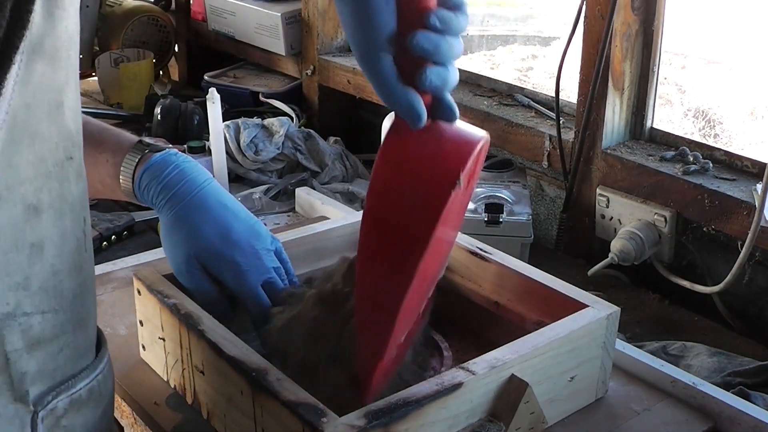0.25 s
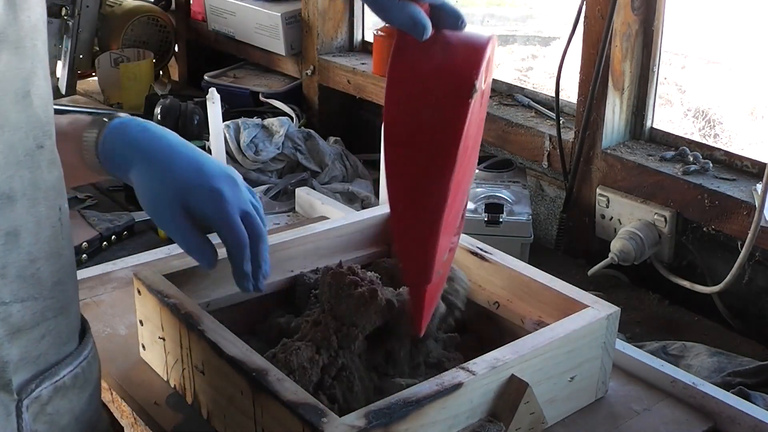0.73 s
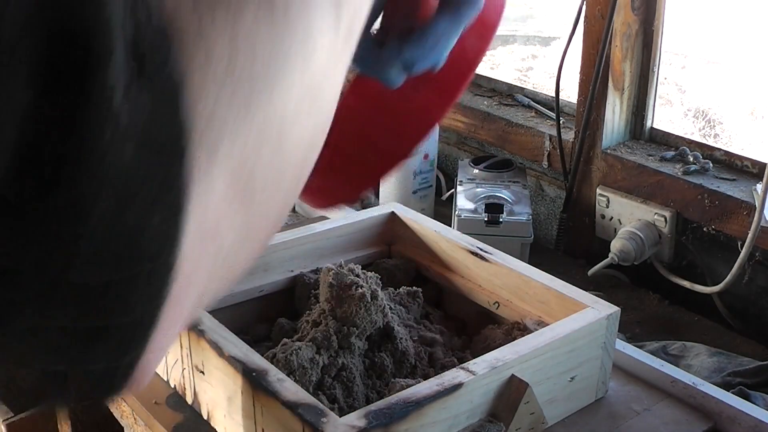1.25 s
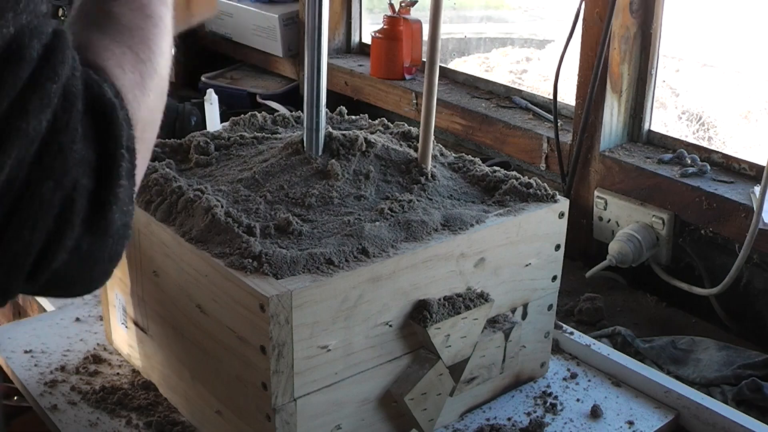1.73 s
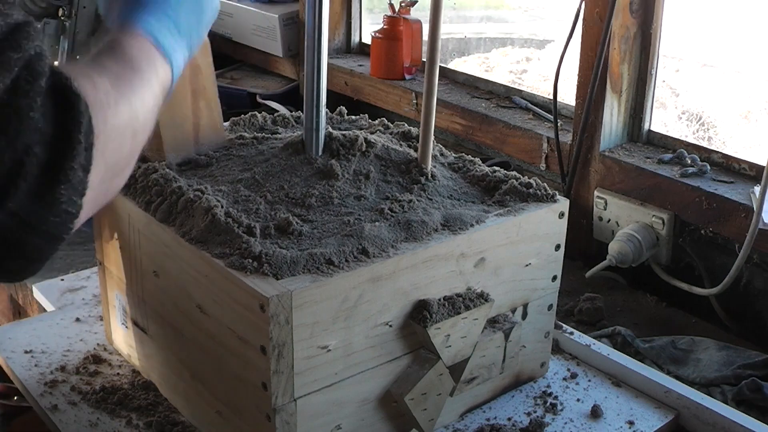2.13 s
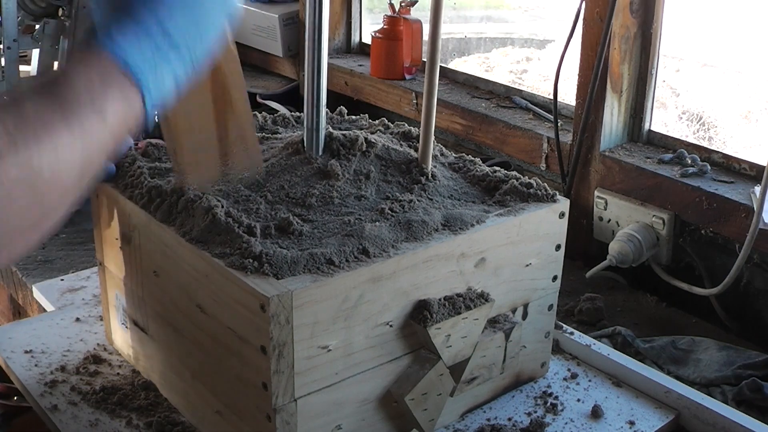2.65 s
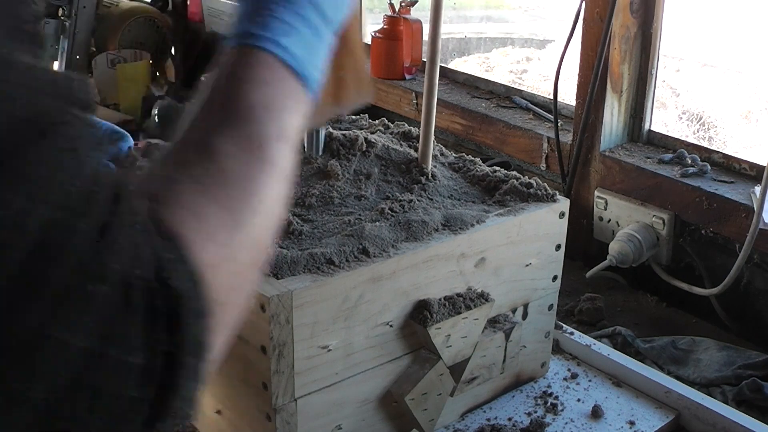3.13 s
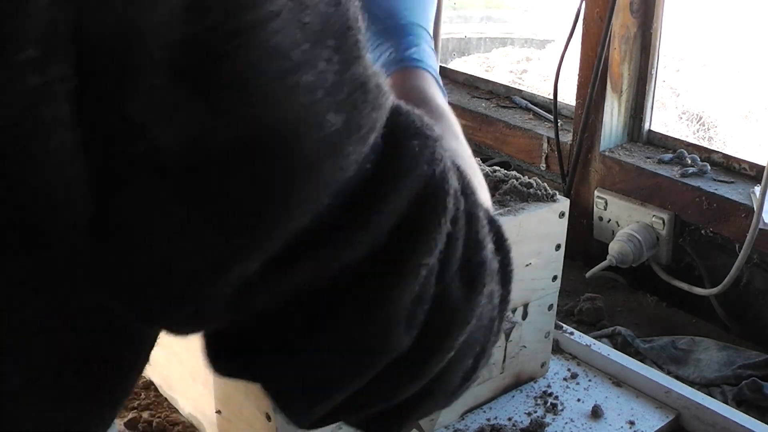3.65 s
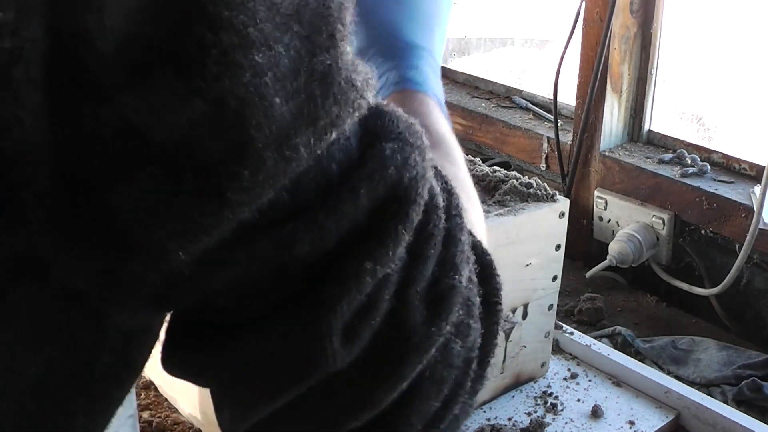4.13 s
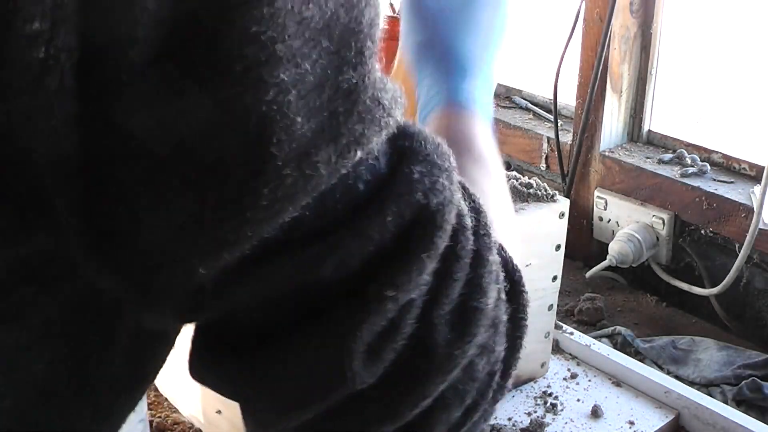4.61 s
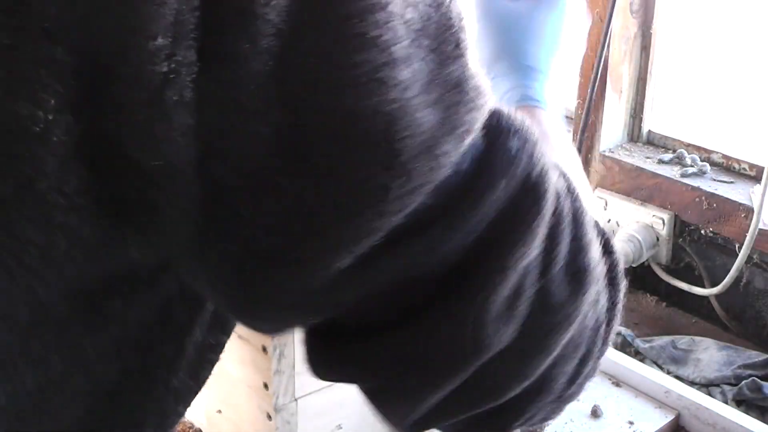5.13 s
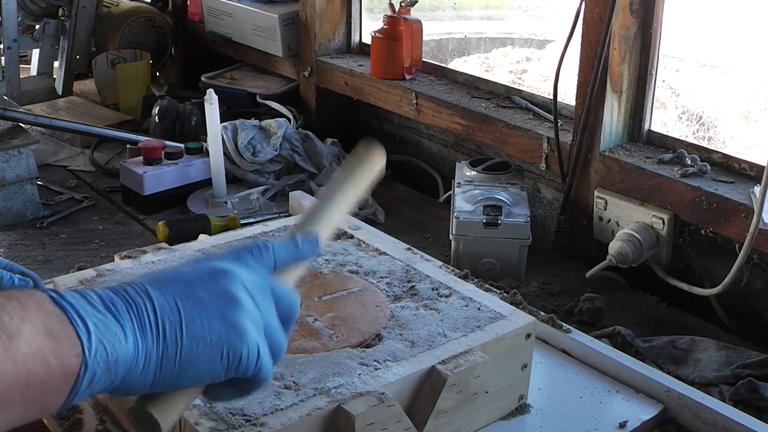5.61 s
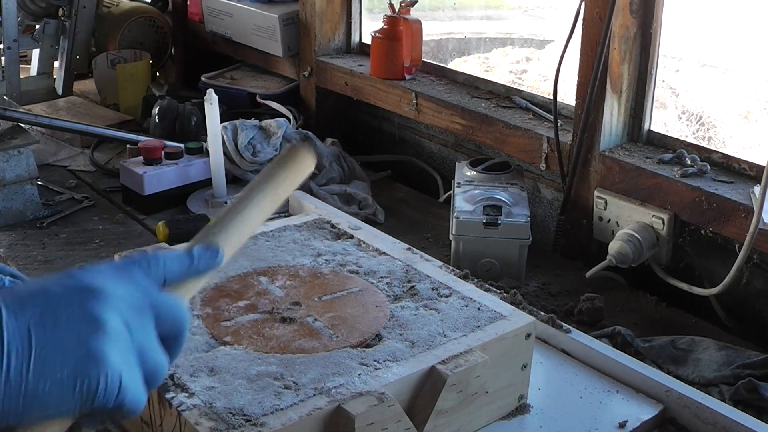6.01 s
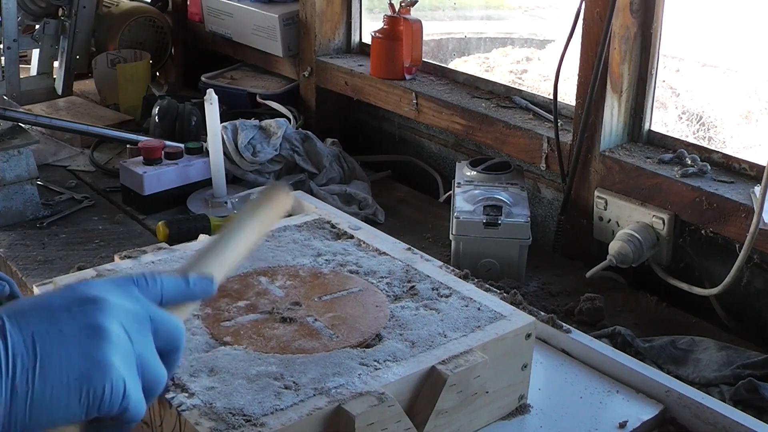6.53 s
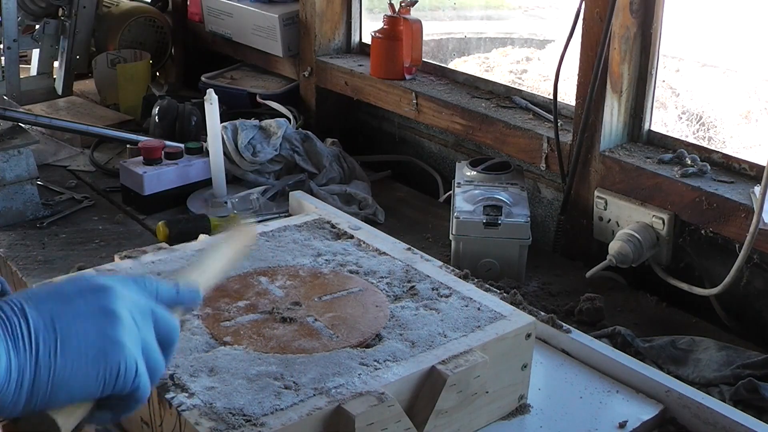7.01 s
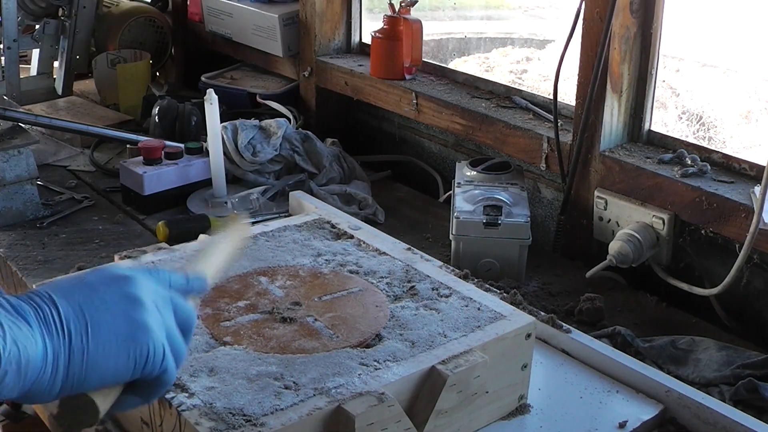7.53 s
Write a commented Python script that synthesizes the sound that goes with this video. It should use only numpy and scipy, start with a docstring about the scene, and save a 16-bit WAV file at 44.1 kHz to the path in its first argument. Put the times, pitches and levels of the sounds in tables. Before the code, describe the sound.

Sand hisses off a scoop and drops into a wooden box with a knock, followed by soft crumbles and rustles. A wooden rammer then packs it with about a dozen dull, gritty thuds that shake the bench. Finally a wooden rod raps the mould in quick, sharp taps that ring briefly. It is all heard from close by in a small workshop, over steady dull air noise.

```python
"""A small workshop, heard from close by. First, moulding sand hisses off a scoop and drops into a
wooden box on a bench, with short crumbles and soft rustles. From 1.3 s a wooden rammer packs the sand:
each blow crushes grains, thuds in the box and sets the bench shaking. From 5.4 s a wooden rod raps the
finished mould in quick, sharp taps, which make it ring. Dull air noise runs underneath throughout."""
import sys
import numpy as np
from scipy import signal
from scipy.fft import rfft, irfft, next_fast_len
from scipy.io import wavfile
from scipy.ndimage import uniform_filter1d, minimum_filter1d

SR = 44100
rng = np.random.default_rng(int(sys.argv[2]) if len(sys.argv) > 2 else 0)


def int16_out(signal):
    """Quantize to a 16-bit WAV file."""
    q = np.round(np.clip(np.atleast_2d(signal).T, -1, 1) * 32767)
    wavfile.write(sys.argv[1], SR, q.astype(np.int16))


N = 342255
TIME = np.arange(N) / SR   # seconds since the scene began
AGE = np.arange(2 ** 15) / SR   # seconds since one short sound began
RAPPING_START_S = 5.365


def amp(db):
    """Turn decibels into a gain to multiply by."""
    return 10 ** (np.asarray(db) / 20)


def rms_one(x):
    """Scale a sound so that its average strength (rms) is 1."""
    return x / np.sqrt(np.mean(x ** 2) + 1e-20)


def peak_one(x):
    """Scale a blow so that its loudest 4 milliseconds have an rms of 1."""
    return x / np.sqrt(uniform_filter1d(x ** 2, size=176, mode="constant").max() + 1e-20)


def at_hz(points, hz):
    """Read between the rows of a table, with frequency counted in octaves."""
    known, values = np.transpose(points)
    return np.interp(np.log(np.maximum(hz, 1)), np.log(known), values)


def add(track, s, sound):
    """Mix a sound into the track, starting at s seconds."""
    start = max(round(s * SR), 0)
    track[start:start + len(sound)] += sound[:N - start]


def coloured(x, spectrum, size=2048):
    """Give a sound a tone colour, using a filter that never rings ahead of a hit (minimum phase)."""
    hz = np.arange(size // 2 + 1) * SR / size
    cepstrum = irfft(np.log(amp(at_hz(spectrum, hz))))
    cepstrum[1:size // 2] *= 2
    cepstrum[size // 2 + 1:] = 0
    return signal.oaconvolve(x, irfft(np.exp(rfft(cepstrum))))[:len(x)]


def dying(t60):
    """A smooth fade. The fade time, t60, is the seconds it takes to fall by 60 dB."""
    return np.exp(-np.log(1000) * AGE / t60)


def fading(s, t60, attack_s=0.0052):
    """A gain over the whole scene: a quick rise at s seconds, then a fade."""
    age = np.maximum(TIME - s, 0)
    return np.minimum(age / attack_s, 1) * amp(-60 * age / t60)


def grains(spread_db, count=len(AGE)):
    """Dense tiny clicks; more spread makes their sizes more unequal."""
    return rng.standard_normal(count) * amp(spread_db * rng.standard_normal(count))


def contact(scatter, t60):
    """One click, followed by a dying scatter of others."""
    force = scatter * rng.standard_normal(len(AGE)) * dying(t60)
    force[0] += 1
    return force


def ring(modes, vary_db, centre_hz=1000, focus_db=0, detune=0):
    """A struck object's own notes (modes), new on each hit; focus_db weakens those far from centre_hz."""
    hz, db, t60 = np.transpose(modes)
    off_centre_db = focus_db * np.log2(hz / centre_hz) ** 2
    strength = amp(db + vary_db * rng.standard_normal(len(hz)) - off_centre_db)
    strength[1::2] *= -1
    hz = hz * (1 + detune * rng.standard_normal(len(hz)))   # the load of sand and hand shifts the notes
    return strength @ (np.sin(2 * np.pi * hz[:, None] * AGE) * dying(t60[:, None]))


# Sound from all around. Each row: frequency in Hz, how alike left and right are from 0 to 1.
EAR_LIKENESS = [(100, 0.89), (500, 0.98), (2000, 0.83), (4000, 0.69), (8000, 0.79), (12000, 1),
                (16000, 0.4)]

def diffuse(spectrum, spread_db=0, count=N):
    """Stereo noise from all around, mostly more alike in the bass than in the treble."""
    size = next_fast_len(count, True)
    hz = np.arange(size // 2 + 1) * SR / size
    alike = np.clip(at_hz(EAR_LIKENESS, hz), -.999, .999)
    colour = amp(at_hz(spectrum, hz))
    mid, side = (irfft(rfft(grains(spread_db, size)) * colour * np.sqrt(share), size)[:count]
                 for share in (1 + alike, 1 - alike))
    return rms_one(np.array([mid + side, mid - side]))


# Tone colours of the air, the hiss and the rumble. Each row: frequency in Hz, relative level in dB.
AIR_COLOUR = [(71, -53), (120, 1), (189, 0.5), (376, -3), (459, 1), (492, -3), (700, -0.5), (807, 1),
              (942, 0), (1540, -6), (2420, -24), (3500, -52), (4550, -47), (7700, -120)]
HISS_COLOUR = [(2000, -12), (3000, -4), (4500, 0), (7000, -1), (10500, -2), (13000, -5), (16000, -6)]
RUMBLE_COLOUR = [(18, -3.5), (36, -4.5), (70, -3.5), (120, -15), (180, -11), (300, -20.5), (600, -25),
                 (2000, -55.5)]

def background(air_db=-47.5, hiss_db=-66, rumble_db=-50, shudder_db=-14, shudder_t60=2.18):
    """Steady dull air noise, a thin hiss, and a low rumble that swells when the rammer shakes the bench."""
    shudder_power = sum((amp(shake + shudder_db) * fading(s, shudder_t60)) ** 2
                        for s, _, _, shake, _, _ in RAMMER_BLOWS)
    rumble_gain = np.sqrt(amp(rumble_db) ** 2 + shudder_power)
    steady = amp(air_db) * diffuse(AIR_COLOUR) + amp(hiss_db) * diffuse(HISS_COLOUR)
    return steady + rumble_gain * diffuse(RUMBLE_COLOUR)


# Tone colour of the room's echo. Each row: frequency in Hz, relative level in dB.
ECHO_COLOUR = [(30, -23), (150, 0.5), (300, -3.5), (600, -2), (1200, -4.5), (2500, -8), (5000, -5.5),
               (10000, -5), (16000, 5.5)]
# How long the echo lasts. Each row: frequency in Hz, fade time in seconds.
ECHO_FADE = [(60, 0.95), (250, 0.39), (600, 0.36), (1500, 0.34), (4000, 0.38), (9000, 0.2), (16000, 0.15)]

def workshop(dry, wet_db, build_s, top_hz=16000):
    """The direct sound plus the room's echo, which builds up quickly and dies sooner in the treble."""
    hz, age, frames = signal.stft(diffuse(ECHO_COLOUR, count=SR), SR, nperseg=256)
    fade = amp(-60 * age / at_hz(ECHO_FADE, hz)[:, None])
    tail = signal.istft(frames * fade, SR)[1][:, :len(AGE)]
    tail = rms_one(tail * (1 - dying(build_s))) / np.sqrt(SR)
    tail = signal.sosfilt(signal.butter(2, top_hz, fs=SR, output="sos"), tail)
    return dry + amp(wet_db) * signal.oaconvolve(dry[None], tail, axes=1)[:, :N]


def clumping(depth_db, count=230):
    """Sand falls in uneven spurts: a gain that wanders some thirty times a second."""
    steps = rng.standard_normal(count)
    return amp(depth_db * np.interp(np.linspace(0, count - 1, N), np.arange(count), steps))


# Tone colours of the hollow scoop and of crunching sand. Each row: frequency in Hz, relative level in dB.
SCOOP_COLOUR = [(100, -1.5), (180, 1.5), (300, -3), (460, -5), (700, 2.5), (1100, -9), (1800, -8.5),
                (2500, -28), (3500, -48)]
SAND_COLOUR = [(1000, -9.5), (2800, -18.5), (4500, -6.5), (7500, -7), (10500, -6), (13000, -11.5),
               (16000, -19)]

def pour(drop_s=.223, empty_s=0.513, emptying_s=0.11, swell_db_per_s=26, scrape_hz=492):
    """Sand gathers pace off the scoop, then drops all at once; loose grains trickle on down the heap."""
    emptying = np.clip((empty_s - TIME) / emptying_s, 0, 1)
    sliding = emptying * amp(-swell_db_per_s * np.abs(TIME - drop_s))
    dropping = fading(drop_s, t60=0.47)
    body_gain = amp(-42.5) * sliding + amp(-29) * dropping
    hiss_gain = amp(-48.5) * (TIME < drop_s) + amp(-37) * dropping
    trickle_gain = amp(-59.5) * fading(drop_s, t60=11)
    # the scoop's hollow note as it drags over the sand
    hollow = signal.iirpeak(scrape_hz, Q=12, fs=SR)
    scrape = amp(-45) * emptying * rms_one(signal.lfilter(*hollow, grains(4.5, count=N)))
    spurts = clumping(depth_db=3.0)
    body = body_gain * diffuse(SCOOP_COLOUR, spread_db=6.3)
    hiss = (hiss_gain + trickle_gain) * diffuse(SAND_COLOUR, spread_db=4.7)
    return spurts * (body + scrape + hiss)


# Crumbles and rustles. Each row: start in seconds, relative level in dB, fade time in seconds.
CRUMBLES_AND_RUSTLES = [(0.0473, -32, 0.046), (0.222, -27.5, 0.056), (0.5656, -39, 0.15),
                        (0.9054, -48, 0.14), (1.0344, -43, 0.19), (1.15, -46, .6), (1.276, -41.5, 0.16),
                        (1.374, -33.5, 0.045), (1.6347, -36, 0.045), (2.6367, -46.5, 0.11),
                        (2.926, -42, 0.19), (2.9915, -34.5, 0.11), (3.17, -48, 0.99), (3.313, -41.5, 0.2),
                        (3.453, -46.5, 0.061), (3.5418, -38, 0.17)]

def crumbles_and_rustles(level_db=-6, swell=0.16):
    """Short showers of crumbling sand and, in the slow rows, soft brushing rustles."""
    out = np.zeros(N)
    for s, db, fade_s in CRUMBLES_AND_RUSTLES:
        burst = grains(8.5) * (1 - dying(swell * fade_s)) * dying(fade_s)
        add(out, s, amp(db + level_db) * peak_one(coloured(burst, SAND_COLOUR)))
    return out


# Hard knocks on the box wall. Each row: start in seconds, relative level in dB, centre pitch in Hz.
WALL_KNOCKS = [(0.227, -17, 432), (0.244, -24, 546), (3.543, -30.5, 560), (3.721, -18.5, 1150),
               (3.836, -24.5, 766), (5.180, -12.5, 382), (5.191, -25, 500)]
# Notes of the bare wall. Each row: pitch in Hz, relative level in dB, fade time in seconds.
WALL_NOTES = [(312, -3, 0.058), (397, 2, 0.068), (516, 4, 0.037), (709, -9, 0.12), (721, -8, 0.11),
              (1213, -5.5, 0.027), (1314, -6.5, 0.06), (1555, -2.5, 0.037), (1715, -13, 0.045)]
# Tone colour of a wooden knock. Each row: frequency in Hz, relative level in dB.
KNOCK_COLOUR = [(100, -19.5), (300, 0.5), (650, 3.5), (1000, -1.5), (1800, -7), (2200, -19.5),
                (2700, -31.5), (4000, -30.5), (16000, -40)]
# Sharp clicks of the tools' edges. Each row: start in seconds, relative level in dB.
EDGE_CLICKS = [(0.2243, -20.5), (0.572, -32), (1.188, -38.5), (1.3246, -38.5), (1.376, -40), (2.1865, -22),
               (5.1808, -25), (5.206, -37), (5.220, -29.5)]

def knocks(level_db=-2, click_db=-8, clatter_db=-9):
    """Scoop and rammer meet the bare wood of the box, which rings and clatters."""
    out = np.zeros(N)
    for s, db, centre_hz in WALL_KNOCKS:
        wood = peak_one(ring(WALL_NOTES, 1.0, centre_hz, focus_db=4.5, detune=.005))
        clatter = amp(clatter_db) * peak_one(coloured(contact(0.13, 0.16), KNOCK_COLOUR))
        add(out, s, amp(db + level_db) * peak_one(wood + clatter))
    for s, db in EDGE_CLICKS:
        add(out, s, amp(db + click_db) * peak_one(coloured(contact(1.0, 0.0048), SAND_COLOUR)))
    return out


# Blows of the rammer. Each row: start in seconds, thud level in dB, thud centre pitch in Hz, then the
# levels of bench shake, wooden knock and sand crunch in dB. All levels are relative.
RAMMER_BLOWS = [(1.325, -19.5, 273, -22.5, -28.5, -59), (1.496, -11.5, 312, -17, -19.5, -31.5),
                (1.941, -15, 196, -14.5, -24, -31), (2.184, -11, 380, -15.5, -18, -34.5),
                (2.436, -17, 262, -18.5, -22, -29), (2.724, -20, 190, -18.5, -25.5, -42),
                (2.963, -13.5, 199, -14, -19, -38), (3.671, -24.5, 216, -26.5, -31.5, -44),
                (3.871, -18, 197, -19.5, -26.5, -39), (4.09, -16.5, 310, -19, -22.5, -39),
                (4.445, -29, 178, -24, -36, -44), (4.668, -20, 190, -19.5, -24, -40),
                (5.176, -14, 370, -19.5, -10, -25)]
# Notes of the sand-filled box and of the bench.
# Each row: pitch in Hz, relative level in dB, fade time in seconds.
BOX_NOTES = [(176.4, -1, 0.092), (210, -6.5, 0.098), (263, -1, 0.082), (314, -0.5, 0.055),
             (352.7, 1, 0.074), (426, -2, 0.059), (530, -13.5, 0.17)]
BENCH_NOTES = [(36.2, 0.5, 0.76), (49, -4.5, 0.37), (68.8, 2, 0.34), (86, 4, .17), (102.2, 2, 0.15),
               (124.2, -5.5, 0.14), (166, -4, 0.11)]

def rammer(bench_lag_s=0.0324, rebound_s=.062, rebound_hz=300):
    """The sand gives way for some milliseconds, the box thuds, and the bench swings a moment later."""
    out = np.zeros(N)
    pressing = 1 - dying(0.012)

    def crush(spread_db, t60, colour):
        """A burst of grains giving way under the rammer."""
        return peak_one(coloured(grains(spread_db) * pressing * dying(t60), colour))

    for s, thud, centre_hz, shake, knock, crunch in RAMMER_BLOWS:
        add(out, s, amp(thud) * peak_one(ring(BOX_NOTES, 1.5, centre_hz, focus_db=10, detune=.015)))
        # the rammer meets loose sand just before it meets firm sand
        add(out, s - .005, amp(knock - 30) * crush(7.8, 0.019, KNOCK_COLOUR))
        add(out, s + rebound_s, amp(thud - 11) * peak_one(ring(BOX_NOTES, 1.7, rebound_hz, focus_db=5)))
        add(out, s, amp(knock - 2) * crush(7.3, 0.095, KNOCK_COLOUR))
        add(out, s, amp(crunch - 1) * crush(8.7, 0.083, SAND_COLOUR))
        # the bench is pushed, then swings
        add(out, s + 0.004, amp(shake - 2) * peak_one(ring(BENCH_NOTES, 2.4, detune=0.11)))
        add(out, s + bench_lag_s, amp(shake - 1) * peak_one(ring(BENCH_NOTES, 1.3, detune=0.011)))
    return out


# Tone colour of a tap's scattered treble. Each row: frequency in Hz, relative level in dB.
SCATTER_COLOUR = [(1000, -42), (2400, -6), (3400, -7.5), (4900, 5.5), (6000, -0.5), (9500, -2), (12000, -5),
                  (16000, -17)]

def scattered_snaps(level_db=-19, t60=0.3):
    """Each snap of the rod comes back from all the tools and shelves as a smooth bright tail."""
    out = np.zeros(N)
    for s, _, snap, _ in rod_contacts():
        tail = peak_one(coloured(grains(1.4) * dying(t60), SCATTER_COLOUR))
        add(out, s + .002, amp(snap + level_db) * tail)
    return out


# Taps of the rod. Each row: start in seconds, relative levels of wood crack, ring and bench shake in dB,
# seconds until the bounce (0 for none).
ROD_TAPS = [(5.527, -7.5, -19.5, -30, .027), (5.719, -8, -15.5, -38, 0), (6.1344, -8.5, -10, -41, 0),
            (6.32, -8, -10, -38, 0), (6.489, -8, -14.5, -54, .031), (6.6813, -9.5, -7.5, -47, 0),
            (7.0195, -3, -4, -21, 0), (7.1823, -5.5, -5, -25.5, 0), (7.3495, -8, -11, -39, 0),
            (7.5257, -10.5, -15, -41, 0), (7.687, -10, -16, -41, .0285)]

def rod_contacts(snap_db=-11.5, loss_db=6, snap_loss_db=17):
    """Give the start and the wood, snap and ring levels of each tap and of any weaker, duller bounce."""
    for s, wood, ringing, _, bounce_s in ROD_TAPS:
        yield s, wood, snap_db, ringing
        if bounce_s:
            yield s + bounce_s, wood - loss_db, snap_db - snap_loss_db, ringing - loss_db


# Tone colours of the wood's crack and its bright snap. Each row: frequency in Hz, relative level in dB.
CRACK_COLOUR = [(60, -14), (200, -8), (380, 6.5), (700, 6), (1100, 0.5), (1900, 4.5), (2400, -10.5),
                (3200, -12.5), (6000, -10.5), (16000, -82)]
SNAP_COLOUR = [(1000, -57), (2700, -1), (4300, -0.5), (6200, 4), (7600, 6), (9600, 9.5), (12500, -2),
               (16000, 1)]
# Notes of the packed mould and of loose metal on the bench.
# Each row: pitch in Hz, relative level in dB, fade time in seconds.
MOULD_NOTES = [(402.5, -2.5, 0.15), (513, -12.5, 0.23), (650, -0.5, 0.14), (961, -1.5, 0.12),
               (1068, 3, 0.053), (1112, -1.5, 0.099), (1480, -25, 0.11), (1608, -7, 0.11),
               (1790, -4, 0.048), (1780, -20, 0.066), (2690, -2, 0.047), (3000, -12.5, 0.068),
               (4280, -17, .08), (9290, -31, .1)]
METAL_NOTES = [(1066, 0, .35), (1097, -2, .35), (2690, -10, .3), (2716, -9, .25), (2765, -10, .25),
               (4750, -15, .3), (4947, -14, .3), (7278, -23, .9)]

def rod(give_s=0.0011, settle_s=0.001082, echo_s=.0085, echo_db=-6):
    """Wood on wood: a double crack with a bright snap, the ringing mould and a dull echo off a wall."""
    out = np.zeros(N)
    dull = signal.butter(2, 1500, fs=SR, output="sos")
    for s, wood, snap, ringing in rod_contacts():
        hit_s = s + give_s
        crack = amp(wood - 1) * peak_one(coloured(contact(0.19, 0.0044), CRACK_COLOUR))
        snap_force = contact(1.0, 0.0065) + 0.11 * grains(3.6) * dying(0.076)
        bright = amp(snap - 2) * peak_one(coloured(snap_force, SNAP_COLOUR))
        # a few clear notes stand out of the many crowded ones of box and bench
        notes = amp(ringing - 5) * peak_one(ring(MOULD_NOTES, 1.5, detune=.008))
        crowded = amp(ringing - 6) * peak_one(coloured(grains(0.33) * dying(0.094), CRACK_COLOUR))
        metal = amp(ringing - 22) * peak_one(ring(METAL_NOTES, 2.0))
        add(out, hit_s, crack + bright + notes + crowded + metal)
        # the rod lands tip first and comes down flat about a millisecond later
        flat_s = hit_s + settle_s * rng.uniform(.7, 1.3)
        add(out, flat_s, -amp(wood - 4) * peak_one(coloured(contact(0.4, 0.0096), CRACK_COLOUR)))
        add(out, hit_s + echo_s, amp(echo_db) * signal.sosfilt(dull, crack + notes))
    # each tap also jolts the bench
    for s, _, _, shake, _ in ROD_TAPS:
        add(out, s, amp(shake) * peak_one(ring(BENCH_NOTES, 1.7) * dying(0.1)))
    # the rapping cuts in abruptly on the dying ring of a tap
    rattle = 0.81 * peak_one(coloured(grains(4.0) * dying(0.22), CRACK_COLOUR))
    notes = peak_one(ring(MOULD_NOTES, 1.37, centre_hz=870, focus_db=13))
    metal = peak_one(ring(METAL_NOTES, 1.5))
    bright = peak_one(coloured(grains(2.6) * dying(0.21), SNAP_COLOUR))
    add(out, RAPPING_START_S, amp(-26) * (notes + rattle) + amp(-37) * metal + amp(-40) * bright)
    return out


def scene():
    """Mix it all; the packing sounds and their echo stop at once where the rapping begins."""
    before_rapping = np.clip((RAPPING_START_S - TIME) / 0.0028 + 1, 0, 1)
    packing = workshop(rammer() + knocks() + crumbles_and_rustles(), wet_db=-7.5, build_s=0.084)
    rapping = workshop(rod(), wet_db=-5.5, build_s=0.0061, top_hz=3480) + scattered_snaps()
    return packing * before_rapping + rapping + pour() + background()


def limiter(x, sense_hz=3000, limit_db=-21, hold_s=0.17, release_db_per_s=46):
    """Sharp treble peaks turn the volume down at once; it holds, then creeps back up."""
    treble = signal.sosfilt(signal.butter(2, sense_hz, "high", fs=SR, output="sos"), x.mean(axis=0))
    level_db = 10 * np.log10(np.maximum(uniform_filter1d(treble ** 2, size=176), 1e-12))
    needed_db = np.minimum(limit_db - level_db, 0)
    half_hold = int(hold_s * SR / 2)
    cut_db = -minimum_filter1d(needed_db, size=2 * half_hold + 1, origin=half_hold, mode="constant")
    recovery_db = release_db_per_s * TIME
    cut_db = np.maximum.accumulate(cut_db + recovery_db) - recovery_db
    ahead_db = np.interp(TIME + .003, TIME, cut_db)   # turn down just before the peak
    return x * amp(-uniform_filter1d(ahead_db, size=88))


# Balance of the microphone's two sides. Each row: frequency in Hz, left minus right in dB.
MIC_BALANCE = [(60, 0.6), (130, 0.8), (290, 0.33), (640, 1.24), (1410, 0.42), (3100, 0.31), (6820, -1),
               (15000, -1.7)]
# Timing of the two sides. Each row: frequency in Hz, how far left leads in radians.
MIC_PHASE = [(500, -0.073), (3000, -0.21), (5500, -0.6), (10000, -0.51), (15000, -1.7)]

def record(dry, bottom_hz=20, top_hz=15900):
    """The microphone's sides hear a little differently; peaks are limited, deepest bass and top are cut."""
    size = next_fast_len(N + SR // 10, True)
    hz = np.arange(size // 2 + 1) * SR / size
    left_gain = amp(at_hz(MIC_BALANCE, hz) / 2) * np.exp(.5j * at_hz(MIC_PHASE, hz))
    x = irfft(rfft(dry, size) * np.array([left_gain, 1 / left_gain]), size)[:, :N]
    x = signal.sosfilt(signal.butter(2, bottom_hz, "high", fs=SR, output="sos"), x)
    x = np.tanh(limiter(x))   # the loudest peaks are rounded
    return signal.sosfilt(signal.ellip(10, .1, 80, top_hz, fs=SR, output="sos"), x)


dry = scene()
out = record(dry)
int16_out(out)
```